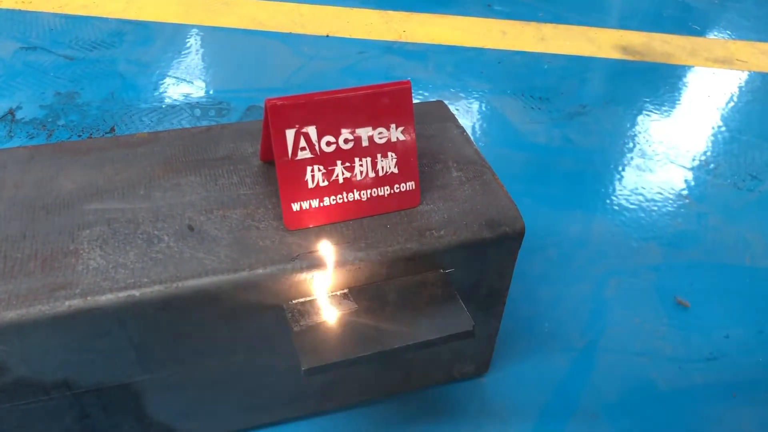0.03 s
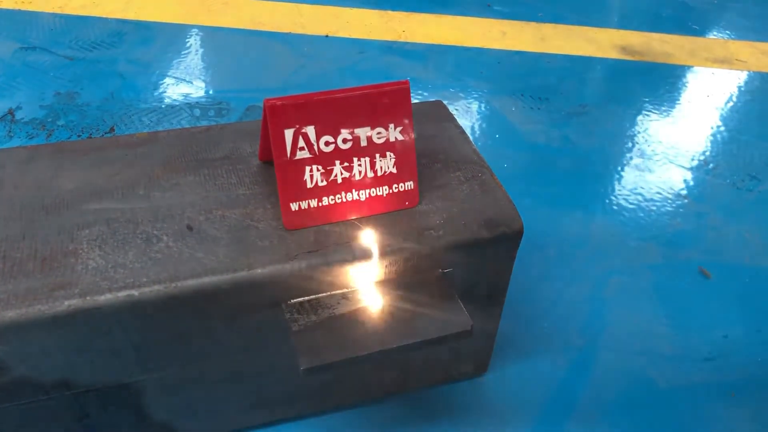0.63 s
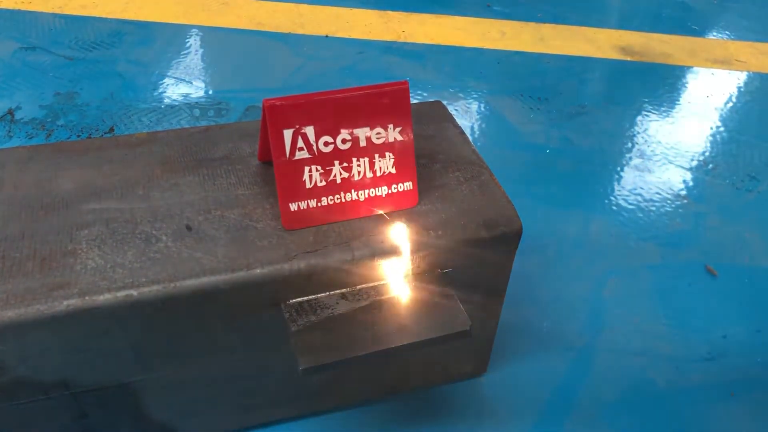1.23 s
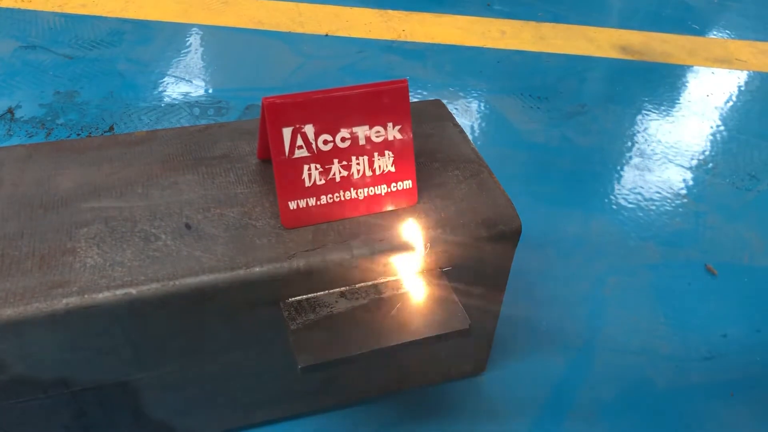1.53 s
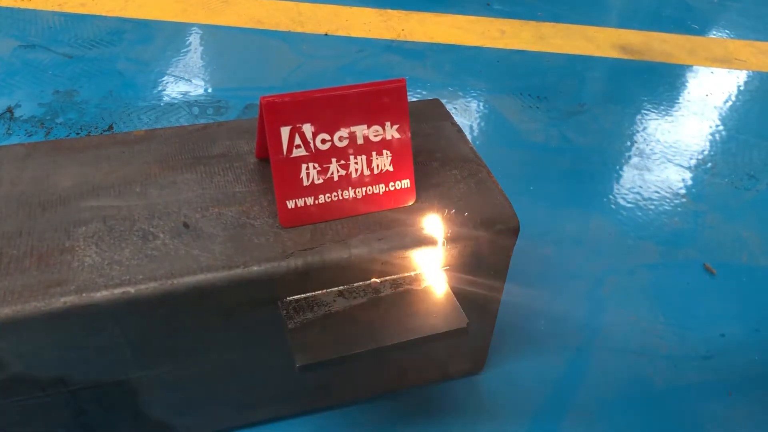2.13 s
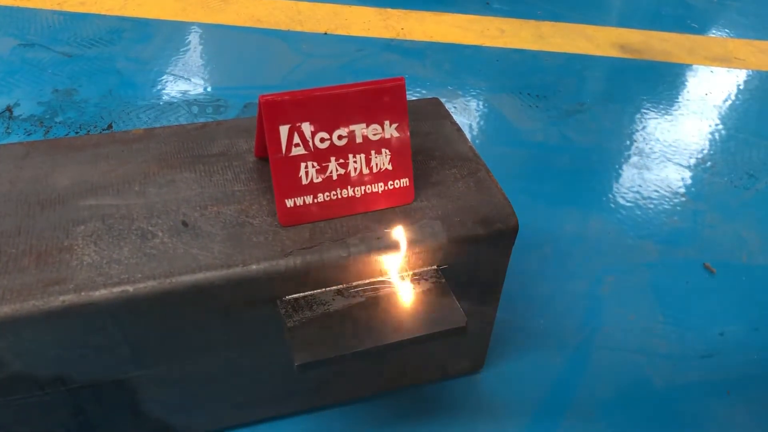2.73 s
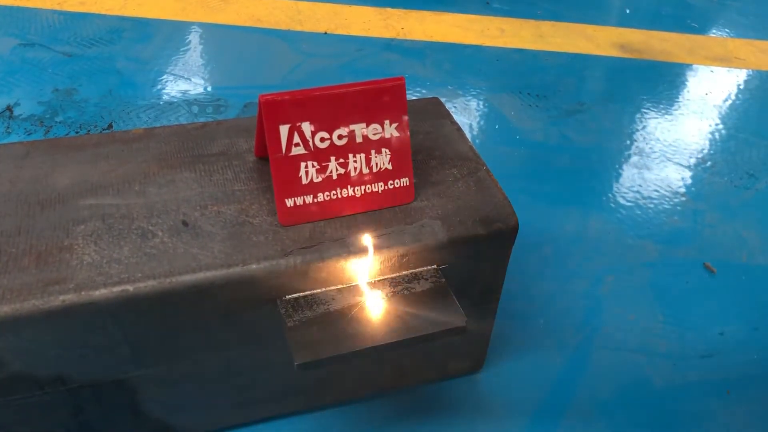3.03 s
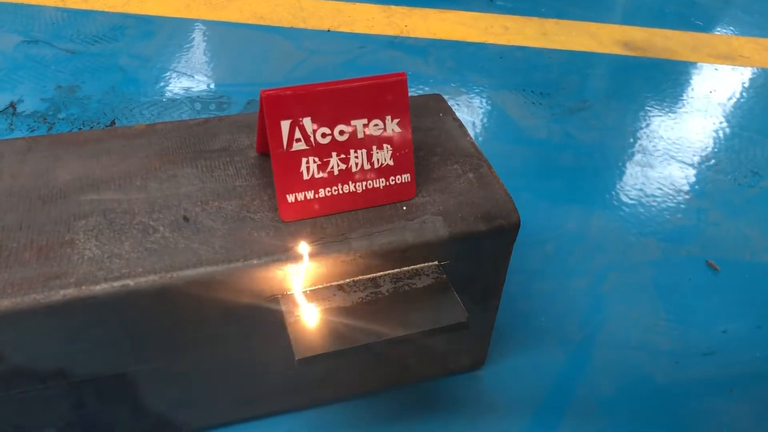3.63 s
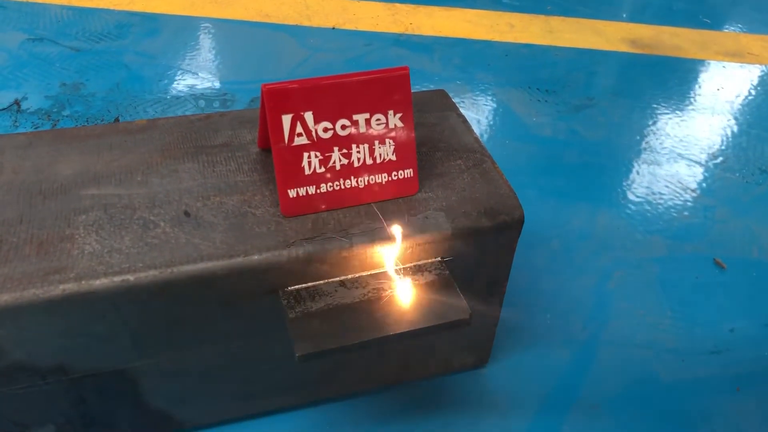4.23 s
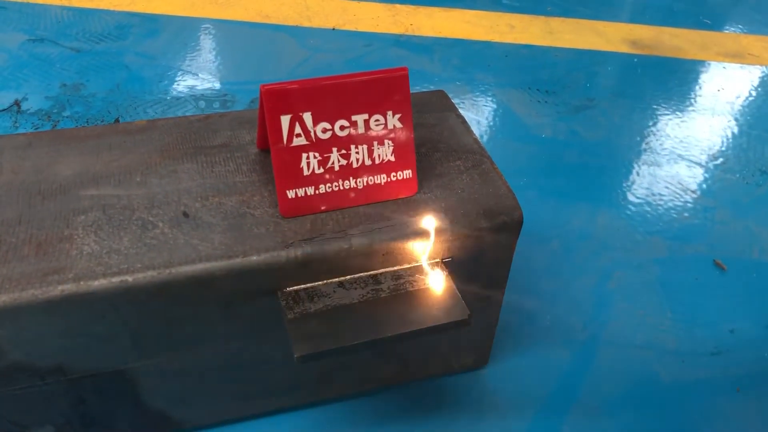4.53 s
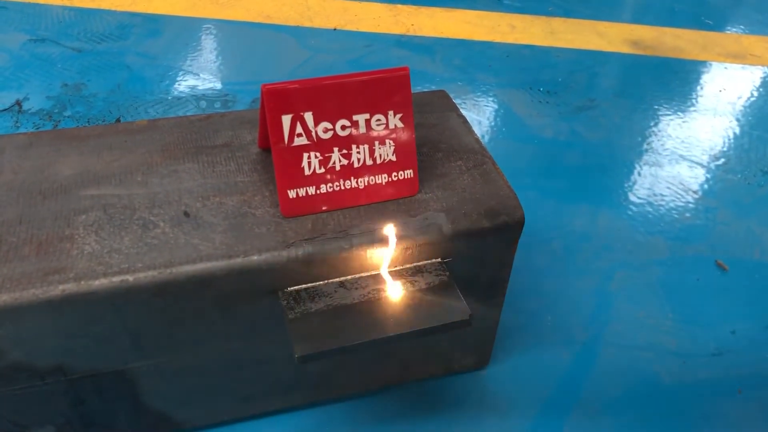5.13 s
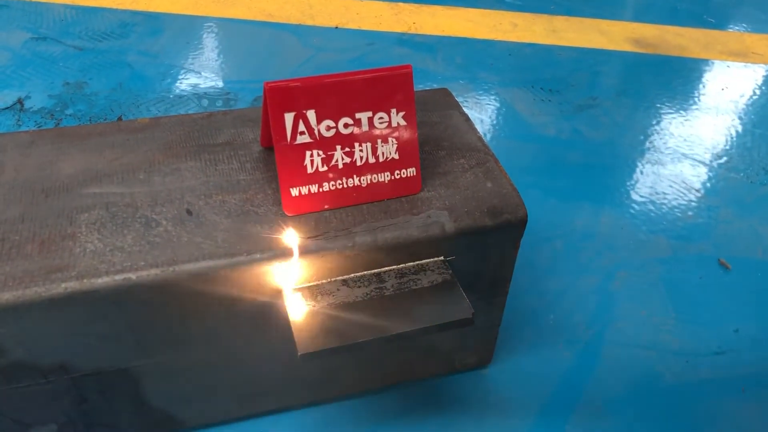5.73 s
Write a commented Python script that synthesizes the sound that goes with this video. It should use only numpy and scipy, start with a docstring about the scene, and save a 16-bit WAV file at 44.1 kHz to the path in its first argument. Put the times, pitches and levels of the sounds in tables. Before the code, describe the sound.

A hand-held laser cleaner strips rust from a steel beam, heard close up as a loud, bright, sizzling hiss that lasts the whole six seconds. Its tone slides gently as the beam sweeps back and forth. From the start until about 2.3 seconds the hiss sputters unevenly, and a hard, steady-pitched buzz of very rapid snaps cuts through it, with short rough flare-ups near 0.3 and 0.9 seconds. From about 2.5 seconds the hiss is smoother, and a lower throb and flutter swell beneath it. The buzz returns softly from 3 to 3.6 seconds, and another rough spurt comes at 4.1. Near 4.5 seconds the throb shrinks, a brief hard buzz follows at 4.7, and the hiss continues, the throb rising again at the very end. The overall loudness stays even. Workshop fans and motors hum faintly behind, with only a slight, short room echo.

```python
"""A hand-held laser cleaner strips rust from a steel beam in a humming workshop.
From the start, a mirror whips the spot along a line about 300 times a second, and rust bursts off in a
hiss, coloured by an echo off the steel. For about two seconds the hiss sputters over bare patches, while
each crossing of a plate's edge snaps, making a hard buzz. Then the glowing plume swells and throbs, and
the buzz returns softly at three seconds. Near 4.5 seconds the plume shrinks; the hiss runs to the end."""
import sys
import numpy as np
from scipy import signal
from scipy.fft import rfft, irfft
from scipy.io import wavfile
from scipy.ndimage import uniform_filter1d, map_coordinates

SR = 44100
rng = np.random.default_rng(int(sys.argv[2]) if len(sys.argv) > 2 else 0)


def unload_audio(sound):
    """Save the sound as a 16-bit wav file, at the path given as the first command line argument."""
    columns = np.transpose(np.atleast_2d(sound))
    # keep every value between -1 and 1, then stretch to whole-number steps
    steps = np.round(np.clip(columns, -1, 1) * 32767)
    wavfile.write(sys.argv[1], SR, steps.astype(np.int16))


N = 255780
SCAN_HZ = 299.095  # the mirror's trips out and back each second


def undb(db):
    """Turn decibels into a number to multiply by."""
    return 10 ** (np.asarray(db) / 20)


def unit(x):
    """Scale a signal to an average power of 1."""
    return x / np.sqrt(np.mean(x ** 2))


def curve(table):
    """Join (seconds, value) rows with straight lines, at every sample."""
    times, values = np.transpose(table)
    return np.interp(np.arange(N) / SR, times, values)


def gate(start, length, attack_s, release_s):
    """Fade in from 0 to 1, hold, and fade out."""
    t = np.arange(N) / SR - start
    return np.clip(t / attack_s, 0, 1) * np.clip((length - t) / release_s, 0, 1)


def drift(rate):
    """A smooth random wobble, about 1 in size, that turns about rate times a second."""
    step = int(SR / rate)
    held = np.repeat(rng.standard_normal(N // step + 2), step)
    return unit(uniform_filter1d(held[rng.integers(step):][:N], step))


def gain_at(hz, spectrum):
    """Look up the gain at any frequency in (Hz, dB) rows."""
    freqs, db = np.transpose(spectrum)
    return undb(np.interp(np.log(np.maximum(hz, 1)), np.log(freqs), db))


def shaped(x, spectrum, size=1024):
    """Filter a sound by (Hz, dB) rows."""
    cepstrum = irfft(np.log(gain_at(np.fft.rfftfreq(size, 1 / SR), spectrum)))
    # fold it so the filter rings only after a sound, never before
    cepstrum[1:size // 2] *= 2
    cepstrum[size // 2 + 1:] = 0
    return signal.fftconvolve(x, irfft(np.exp(rfft(cepstrum))))[:N]


def colour(x, spectrum):
    """Filter a sound, then scale its power to 1."""
    return unit(shaped(x, spectrum))


def clicks(times, sizes, reach=8):
    """Clean clicks that can fall between samples."""
    at = times[:, None] * SR
    taps = np.floor(at).astype(int) + np.arange(1 - reach, reach + 1)
    shape = np.sinc(taps - at) * np.cos(np.pi * (taps - at) / (2 * reach)) ** 2
    return np.bincount(np.clip(taps, 0, N).ravel(), (shape * sizes[:, None]).ravel(), N + 1)[:N]


def scan_phase():
    """How far the mirror has gone through its cycles, in radians."""
    return 2 * np.pi * SCAN_HZ * np.arange(N) / SR


# The hum of motors. Each row: pitch in Hz, level in dB.
MOTOR_TONES = [(53.8, -66), (199.2, -55)]
# The rush of fans. Each row: frequency in Hz, relative level in dB.
FAN_SPECTRUM = [(40, -43), (55, -2), (70, 0), (150, 1.5), (260, -16), (600, 1.5), (2000, -12), (12000, -15)]
def machines(fan_db=-51):
    """Fans and motors drone on in the hall."""
    t = np.arange(N) / SR
    hum = sum(undb(db + drift(4)) * np.sin(2 * np.pi * hz * t + .2 * drift(3)) for hz, db in MOTOR_TONES)
    return np.sqrt(2) * hum + undb(fan_db) * colour(rng.standard_normal(N), FAN_SPECTRUM)


def hall_echo(x, echo_db=-21, fade_s=0.22):
    """The hall adds a faint, short tail to a sound."""
    t = np.arange(SR // 2) / SR
    tail = rng.standard_normal(len(t)) * np.exp(-np.log(1000) * t / fade_s)
    return x + undb(echo_db) * signal.fftconvolve(x, tail / np.linalg.norm(tail))[:N]


# How late the echo off the steel is as the hand moves. Each row: time in seconds, delay in milliseconds.
ECHO_DELAY = [(0.05, 2.085), (0.51, 2.042), (2.32, 1.961), (2.67, 1.996), (3.13, 2.051), (3.69, 2.097),
              (4.11, 2.008), (4.44, 1.957), (5.02, 1.934), (5.15, 1.95), (5.48, 2.05), (5.74, 2.07)]
# What the steel throws back. Each row: frequency in Hz, gain in dB.
STEEL_SPECTRUM = [(1000, -18.5), (1750, -15), (2200, -5.5), (3100, -5.5), (3700, -4), (4550, -3),
                  (5200, -8.5), (6300, -8), (7300, -4.5), (8600, -5), (11500, -5)]
def steel_reflection(x, direct_db=-1):
    """An echo off the beam cancels some pitches and boosts others; they slide as the hand moves."""
    delay = curve(ECHO_DELAY) * SR / 1000
    echo = map_coordinates(shaped(x, STEEL_SPECTRUM), [np.arange(N) - delay], order=3)
    return undb(direct_db) * (x + echo)


# How thickly the rust bursts off. Each row: time in seconds, level in dB.
BURN_LEVEL = [(0, -11), (.22, -12.5), (.37, -10), (.52, -16.5), (.7, -14.5), (.9, -10), (1.08, -12.5),
              (1.21, -12.5), (1.5, -13), (1.7, -12.5), (2.15, -15), (2.7, -12.5), (3.6, -10), (4.45, -11),
              (4.68, -14), (5, -12), (5.55, -10), (5.8, -11.5)]
USUAL_BURN_DB = -13
# Nearly bare spots where the hiss sputters. Each row: start in seconds, length in seconds, dip in dB.
BARE_PATCHES = [(0.434, 0.046, -7), (0.483, 0.068, -3.5), (.58, 0.037, -6), (0.632, 0.054, -5.5),
                (.705, .045, -8), (.775, .045, -5.5), (0.86, .055, -3.5), (.955, 0.093, -9),
                (1.12, 0.039, -4), (1.221, 0.12, -6.5), (1.509, 0.13, -7), (1.743, 0.07, -6),
                (2.007, 0.043, -7), (2.105, 0.083, -4), (3.051, .068, -8), (5.675, 0.046, -3)]
def rust_feed(thinning_share=0.4, catch_s=0.016):
    """How much rust bursts off, in dB above the usual; it thins at each bare patch, then catches again."""
    dips = sum(db * gate(start, length, thinning_share * length, catch_s)
               for start, length, db in BARE_PATCHES)
    return curve(BURN_LEVEL) - USUAL_BURN_DB + dips


# How big the glowing plume is. Each row: time in seconds, size in dB.
PLUME_SIZE = [(0, -8), (.7, -10), (1.3, -8.5), (1.8, -6), (2.3, -9), (2.62, -0.5), (3.55, -2.5), (3.95, 0),
              (4.42, 1), (4.65, -9), (5.5, -11.5), (5.8, -1)]
# Its throb. Each row: multiple of the scan rate, base level in dB, dB gained per dB of plume size.
THROB_TONES = [(1, -48, 1.3), (2, -50, 1.2), (3, -46, 0.67), (4, -38.5, 0.77)]
# Its flutter and its deeper rumble. Each row: frequency in Hz, relative level in dB.
FLUTTER_SPECTRUM = [(100, -38), (250, 0.5), (400, 0), (700, -3), (1200, 5.5), (2500, -30)]
RUMBLE_SPECTRUM = [(40, -14), (80, -12), (160, 6), (260, -11), (600, -36)]
def plume(feed_db, flutter_db=-42, rumble_db=-53, unsteady_db=2, gust_db=2.0):
    """The hot plume flutters, rumbles and throbs with the mirror, louder with size and with more rust."""
    phase, size_db = scan_phase(), curve(PLUME_SIZE)
    throb = 0
    for multiple, db, growth in THROB_TONES:
        gain = undb(db + growth * size_db + 0.99 * feed_db + unsteady_db * drift(11))
        throb += gain * np.sin(multiple * phase + 0.2 * drift(11))
    flutter = colour(rng.standard_normal(N), FLUTTER_SPECTRUM)
    flutter *= undb(flutter_db + .6 * size_db + 1.3 * feed_db)
    rumble = colour(rng.standard_normal(N), RUMBLE_SPECTRUM)
    rumble *= undb(rumble_db + 0.45 * size_db + 1.6 * feed_db)
    return np.sqrt(2) * throb + (flutter + rumble) * undb(gust_db * drift(18))


# The plume's flare-ups. Each row: start in seconds, length in seconds, level in dB,
# strongest pitch as a multiple of the scan rate.
FLARES = [(0.299, 0.097, -35.5, 1.48), (.778, 0.15, -41.5, 3.1), (.903, 0.057, -43, 1.2),
          (0.917, 0.07, -27, 4.8), (1.05, .071, -49, 2), (1.19, 0.061, -44, 1.4), (1.365, 0.11, -46.5, 2.2),
          (1.65, 0.17, -54, 2), (1.85, 0.099, -47, 2), (2.16, 0.28, -48, 2.5), (2.42, 0.27, -40, 4),
          (2.62, 0.13, -45, 1), (3.203, 0.12, -44, 1), (4.06, .11, -27.5, 5), (4.303, .12, -45, 1)]
def flare_ups(spread=0.77, attack_s=.008, release_s=0.014, rough_db=2):
    """The plume flares in sudden spurts of rough, low buzz, each strongest around one pitch."""
    phase, multiples = scan_phase(), np.arange(1, 7)
    tones = np.array([undb(rough_db * drift(90)) * np.sin(k * phase + 0.67 * drift(22))
                      for k in multiples])
    out = 0
    for start, length, db, centre in FLARES:
        weights = np.exp(-((multiples - centre) / spread) ** 2)
        out += unit(weights @ tones) * undb(db) * gate(start, length, attack_s, release_s)
    return out


# The tone of bursting rust. Each row: frequency in Hz, relative level in dB.
HISS_SPECTRUM = [(300, -35), (1000, -24), (1350, -16.5), (1550, -10), (1900, -4), (2220, 0), (2700, -3),
                 (3400, -4.5), (4200, -7.5), (5400, -5.5), (7000, -1.5), (8600, -12), (11300, -13.5),
                 (12500, -25)]
def rust_hiss(feed_db, scatter_db=3.5, flicker_db=0.2, patchy_db=1.34, dulling=0.067, count=70000):
    """Countless tiny bursts blur into a hiss; patchy rust makes it flicker, and thin rust sounds duller."""
    when, side = rng.random((count, 2)).T
    sizes = undb(scatter_db * rng.standard_normal(count)) * np.sign(side - .5)
    hiss = colour(clicks(when * N / SR, sizes), HISS_SPECTRUM)
    low = signal.sosfiltfilt(signal.butter(2, 4500, fs=SR, output="sos"), hiss)
    treble = (hiss - low) * undb(dulling * np.minimum(feed_db, 0) + patchy_db * drift(45))
    return (low * undb(patchy_db * drift(45)) + treble) * undb(flicker_db * drift(60))


def retrace(drift_hz=7):
    """Each scan meets nearly the same rust as the last, so part of the hiss repeats as wavering tones."""
    phase, out = scan_phase(), 0
    for k in range(5, 40):
        # the lowest tones come from broad patches and repeat best
        gain = gain_at(k * SCAN_HZ, HISS_SPECTRUM) * (1 + 2.4 * np.exp(-(k - 5) / 0.53))
        out += gain * (drift(drift_hz) * np.cos(k * phase) + drift(drift_hz) * np.sin(k * phase))
    return unit(out)


# When the line lies across the plate's edge. Each row: start in seconds, length in seconds,
# base level of the snaps in dB.
EDGE_SPELLS = [(0, 0.096, -20), (0.298, 0.79, -18.5), (1.098, 0.54, -17.5), (1.714, 0.543, -19.5),
               (3.058, .52, -28), (4.69, 0.078, -20)]
def edge_contact(feed_db, grazing_db=-38.5, slide_s=0.018, bare_boost=0.14):
    """Snaps are faint when the line grazes the edge, strong across it, and hardest on bare steel."""
    across = sum(undb(db) * gate(start, length, slide_s, slide_s) for start, length, db in EDGE_SPELLS)
    return (undb(grazing_db) + across) * undb(-bare_boost * feed_db)


# The gap between the snap going out and the one coming back. Each row: time in seconds, share of a scan.
SNAP_GAP = [(0, .35), (1.4, .35), (1.6, .365), (2.1, .31), (2.3, .33), (3.1, .43), (5.8, .45)]
# The tone of a snap. Each row: frequency in Hz, relative level in dB.
SNAP_SPECTRUM = [(300, -38.5), (1000, -24.5), (1600, -8), (2200, -4), (4000, -6), (5500, 0.5), (7000, 0),
                 (9000, -0.5), (11000, -0.5), (12500, -15)]
def edge_snaps(feed_db, jitter_s=4e-6, scatter_db=2.0, wander_s=13e-6, unsteady_db=0.3):
    """The spot snaps over the edge twice a scan, making a buzz; more rust makes the timing less even."""
    centres = np.arange(1, int(N / SR * SCAN_HZ)) / SCAN_HZ
    index = (centres * SR).astype(int)
    half_gap = curve(SNAP_GAP)[index] / SCAN_HZ / 2
    jitter = jitter_s * undb(2 * feed_db[index])
    out = 0
    for side in (-1, 1):
        # the ragged edge changes each snap's timing and size, so the overtones trade strength
        time_chance, size_chance = rng.standard_normal((len(centres), 2)).T
        times = centres + side * half_gap + wander_s * drift(10)[index] + jitter * time_chance
        sizes = undb(unsteady_db * drift(11)[index] + scatter_db * size_chance)
        out += clicks(times, sizes)
    return colour(out, SNAP_SPECTRUM)


def scene(retrace_db=-14, snap_db=-0.7):
    """Mix the layers into two matching channels; the amount of rust steers hiss, snaps and plume."""
    feed_db = rust_feed()
    burn = (rust_hiss(feed_db) + undb(retrace_db) * retrace()) * undb(USUAL_BURN_DB + feed_db)
    snaps = edge_snaps(feed_db) * edge_contact(feed_db) * undb(snap_db)
    mono = hall_echo(steel_reflection(burn + snaps)) + plume(feed_db) + flare_ups() + machines()
    return np.array([mono, mono])


def even_level(x, target_db=-14, ratio=2.68, window_s=0.031):
    """Pull the loudness toward a target, so the snaps come forward whenever the hiss thins."""
    power = uniform_filter1d(x ** 2, int(window_s * SR))
    level_db = 10 * np.log10(np.maximum(power, 1e-9))
    return x * undb((target_db - level_db) * (1 - 1 / ratio))


def record(dry, bass_hz=47, top_hz=12000, ceiling=.85):
    """Drop the deepest bass, even out the loudness, round off tall peaks and cut the highest treble."""
    thin = signal.sosfilt(signal.butter(10, bass_hz, "high", fs=SR, output="sos"), dry)
    rounded = ceiling * np.tanh(even_level(thin) / ceiling)
    return signal.sosfilt(signal.ellip(10, .2, 75, top_hz, fs=SR, output="sos"), rounded)


dry = scene()
out = record(dry)
unload_audio(out)
```